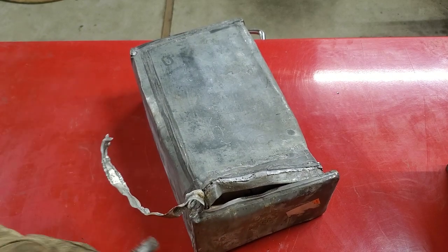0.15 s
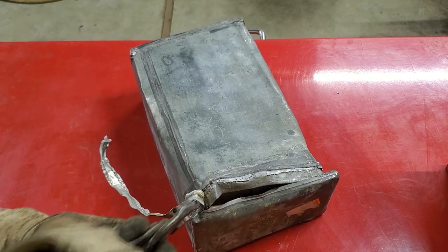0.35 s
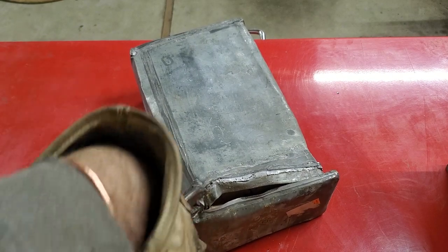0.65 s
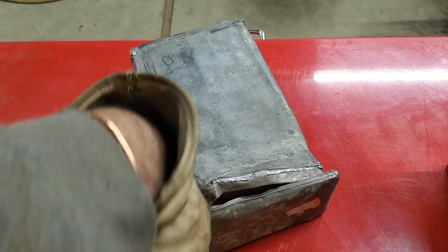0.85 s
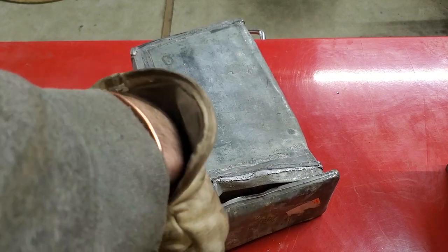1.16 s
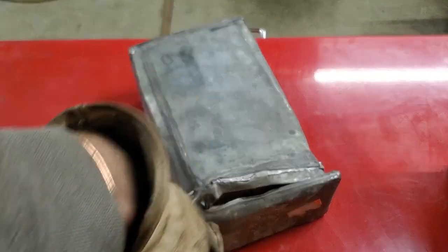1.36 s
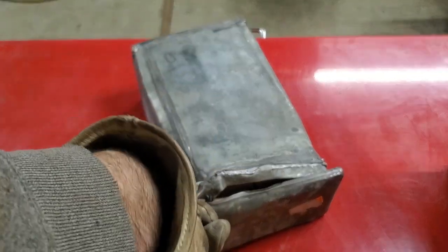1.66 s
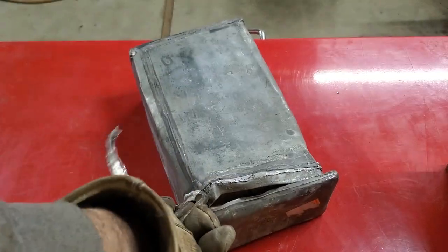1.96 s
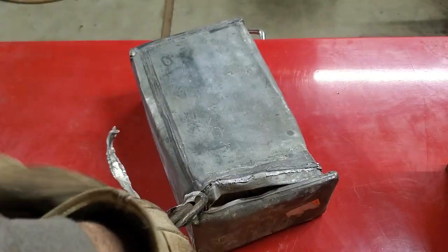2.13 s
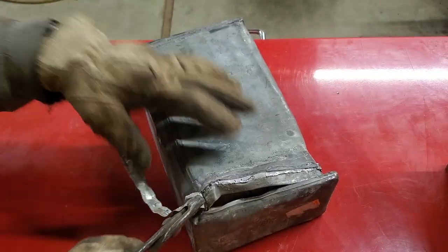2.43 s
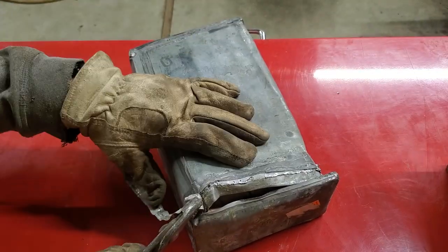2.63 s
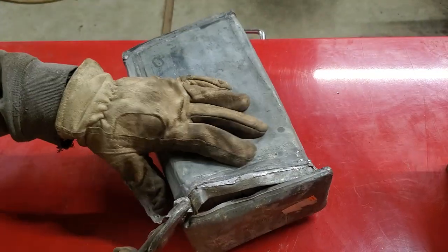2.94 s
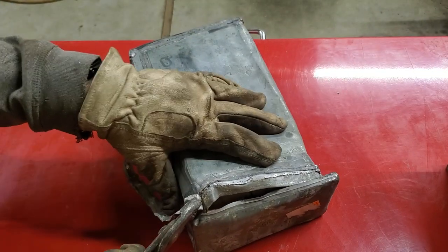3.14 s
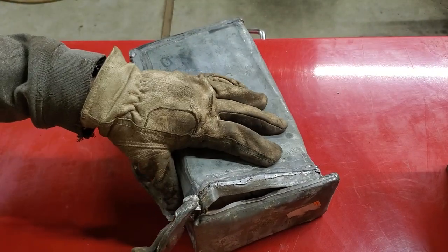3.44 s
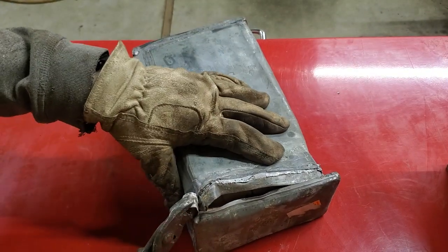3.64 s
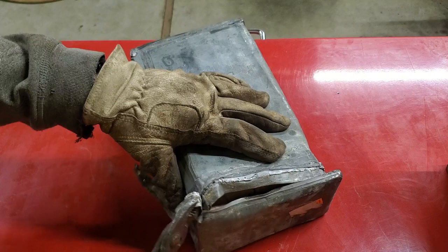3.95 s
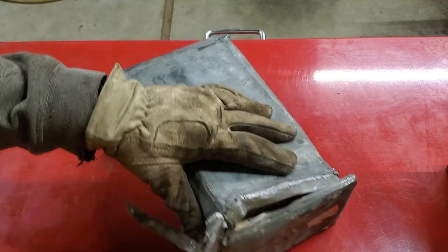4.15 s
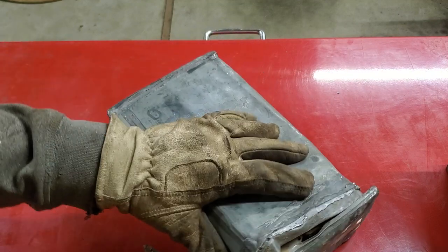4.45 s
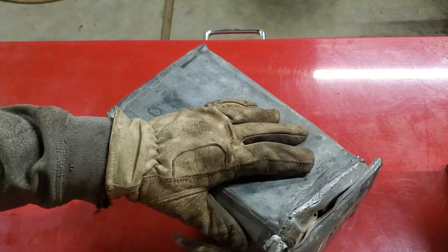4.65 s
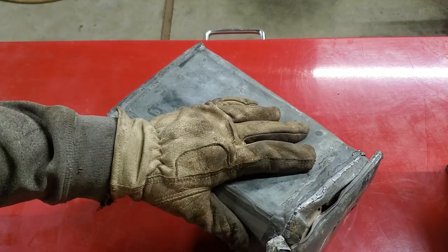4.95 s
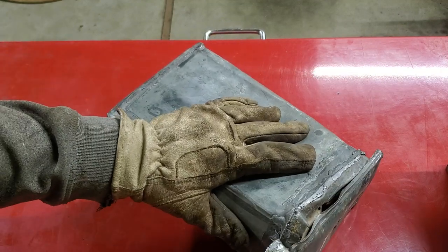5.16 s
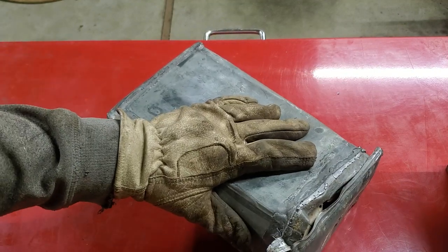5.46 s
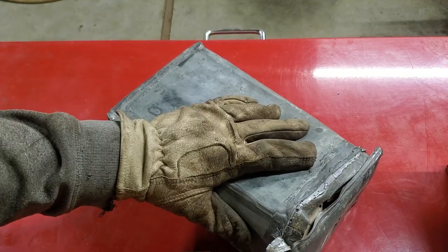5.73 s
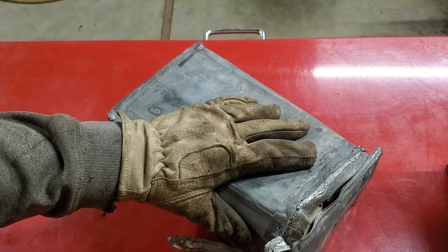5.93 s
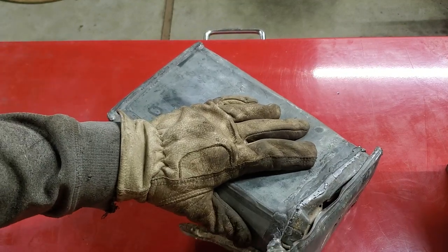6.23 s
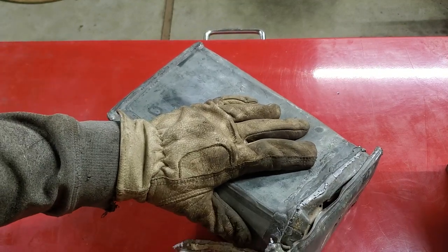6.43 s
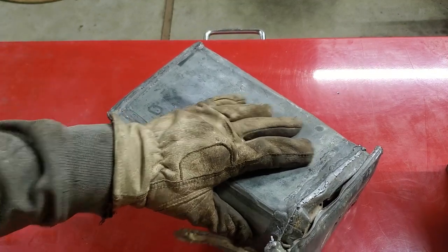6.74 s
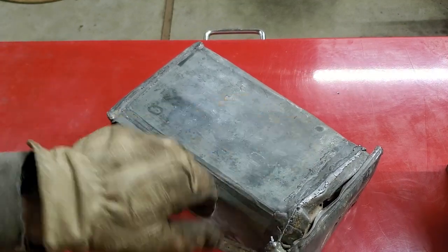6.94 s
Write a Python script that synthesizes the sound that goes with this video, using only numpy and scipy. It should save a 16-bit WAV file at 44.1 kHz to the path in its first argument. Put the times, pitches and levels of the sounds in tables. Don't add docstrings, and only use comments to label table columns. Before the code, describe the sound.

Close stereo pickup in a humming workshop. Gloves and sleeves rustle while pliers tick faintly at a thin tin. Small knocks follow, then a hard hollow clank with a bright wire jingle just after three seconds and another as the tin is turned. Leather squeaks thinly, steel clicks scatter, and a loud snap with a thunk ends it.

```python
import sys
import numpy as np
from scipy import signal
from scipy.fft import rfft, irfft
from scipy.io import wavfile
from scipy.ndimage import uniform_filter1d

SR = 44100
rng = np.random.default_rng(int(sys.argv[2]) if len(sys.argv) > 2 else 0)


def pcm_store(signal):
    levels = np.round(np.clip(np.atleast_2d(signal), -1, 1) * 32767)
    wavfile.write(sys.argv[1], SR, levels.astype(np.int16).T)


def natural_amplitude(level_db):
    exponent = np.asarray(level_db, float) / 20
    return 10 ** exponent


N = 312669

# frequency in Hz, level in dB, t60 in s.
BODY = [(60.4, -48, 0.13), (87.3, -9.5, 0.44), (137, -7.5, 0.5), (153, -2, 0.37), (175, 1.5, 0.14),
        (210, -6, 0.69), (251.8, 8.5, 0.087), (323.7, -5.5, 0.2), (386.4, 3, 0.08), (462, 6, 0.05),
        (541, -6.5, 0.23), (593, -6, 0.19), (732, -11.5, 0.069), (925, -15, 0.012)]


def evened(x):
    return x / np.sqrt(np.mean(x ** 2) + 1e-20)


def read(points, hz):
    f, value = np.transpose(points)
    return np.interp(np.log(hz + 1), np.log(f + 1), value)


def add(mix, s, sound):
    part = mix[..., round(s * SR):][..., :sound.shape[-1]]
    part += sound[..., :part.shape[-1]]


def band(x, lo_hz, hi_hz):
    return signal.sosfilt(signal.butter(2, [lo_hz, hi_hz], "band", fs=SR, output="sos"), x)


def ring(modes, t):
    return sum(natural_amplitude(db - 60 * t / t60) * np.sin(2 * np.pi * hz * t) for hz, db, t60 in modes)


def pair(a, b):
    # frequency in Hz, shared part from -1 to 1.
    likeness = [(60, 0.97), (130, 0.99), (290, 0.85), (640, 0.19), (1410, -0.35), (3100, 0.019),
                (6820, -0.049), (15000, -0.011)]
    same = read(likeness, np.fft.rfftfreq(N, 1 / SR))
    second = same * rfft(a) + np.sqrt(1 - same ** 2) * rfft(b)
    return np.array([a, irfft(second, N)])


def split(a, b):
    split_hz = 350
    low = signal.butter(1, split_hz, "low", fs=SR)
    high = signal.butter(1, split_hz, "high", fs=SR)
    return np.array([a, signal.lfilter(*low, a) + signal.lfilter(*high, b)])


def hum():
    # frequency in Hz, density in dB per Hz.
    spectrum = [(25, -108), (45, -77), (63, -61.5), (85, -80.5), (120, -65.5), (160, -76), (300, -84.5),
                (500, -81), (700, -88), (1100, -94), (2000, -91), (4000, -99), (6500, -101), (8200, -109),
                (11000, -104), (16000, -106)]
    hz, _, z = signal.stft(rng.standard_normal((2, N)), SR, nperseg=4096)
    patches = uniform_filter1d(rng.standard_normal(z.shape[1:]), 6, 0)
    patches = evened(uniform_filter1d(patches, 4, 1))
    drift_db = 1.6 + 2.46 * (hz < 110)
    z = z * natural_amplitude(read(spectrum, hz)[:, None] + drift_db[:, None] * patches) * np.sqrt(SR / 2)
    return pair(*signal.istft(z, SR, nperseg=4096)[1][:, :N])


def rub():
    # start in s, length in s, cloth level in dB, leather level in dB.
    stroke_rows = [(0, 0.066, -50.5, -61), (0.082, 0.3, -55, -65), (1.098, 0.12, -61, -60.5),
                   (1.18, 0.13, -56, -63), (1.652, .22, -74, -68), (1.899, 0.16, -50, -50.5),
                   (1.958, 0.2, -63, -57.5), (2.08, 0.31, -59.5, -67), (2.374, 0.094, -57, -57),
                   (2.526, 0.21, -52.5, -52), (2.678, 0.18, -68, -60.5), (2.858, 0.32, -49.5, -52),
                   (3.274, 0.092, -59, -52.5), (3.441, 0.3, -47, -58), (3.594, 0.18, -39.5, -58),
                   (3.886, 0.16, -55, -70), (4.024, 0.46, -50.5, -64), (4.235, 0.15, -57, -59),
                   (4.337, 0.19, -51.5, -67), (4.454, 0.2, -52, -55), (4.596, 0.38, -48, -52.5),
                   (5.012, 0.14, -58, -65), (5.26, .1, -58, -57.5), (5.398, 0.2, -55, -59),
                   (5.647, 0.54, -51, -57), (6.317, 0.15, -57, -58.5), (6.447, 0.67, -60, -57),
                   (6.793, 0.13, -52, -52), (6.829, 0.14, -39.5, -62), (6.922, 0.19, -51.5, -66)]
    # time in s, restlessness in dB, weight on the tin in dB.
    hands = [(0, -59, -50.5), (.35, -74.5, -64.5), (1.0, -68.5, -53.5), (1.302, -71, -55.5),
             (1.8, -63, -54), (2.85, -67, -55), (3.35, -57.5, -42), (3.75, -63.5, -53.5), (4.4, -56, -47.5),
             (4.95, -67.5, -54.5), (5.6, -56.5, -52), (6.25, -65, -57), (6.5, -60, -55), (7.09, -55, -48.5)]
    rise, fall = 0.33, 0.66
    cloth_rest_db, stroke_drag_db = 1, 5
    t = np.arange(N) / SR
    s, rest_db, weight_db = np.transpose(hands)
    rest = natural_amplitude(np.interp(t, s, rest_db))
    strokes = np.zeros((2, N))
    for start, length, *db in stroke_rows:
        u = np.arange(0, 1, 1 / (length * SR))
        ramp = np.minimum(np.minimum(u / rise, (1 - u) / fall), 1)
        add(strokes, start, natural_amplitude(np.array(db))[:, None] * np.sin(np.pi / 2 * ramp) ** 2)

    cloth_gain = np.hypot(strokes[0], natural_amplitude(cloth_rest_db) * rest)
    leather_gain = np.hypot(strokes[1], rest)
    drag_gain = np.hypot(natural_amplitude(stroke_drag_db) * strokes[1], natural_amplitude(np.interp(t, s, weight_db)))

    grit = natural_amplitude(1.33 * evened(uniform_filter1d(rng.standard_normal(N), 250)))
    a, b = rng.standard_normal((2, 2, N)) * grit
    stiff = [(hz, db + 2.3 * np.log2(hz / 250), 0.35 * t60) for hz, db, t60 in BODY]
    drag = signal.oaconvolve(a, ring(stiff, np.arange(8000) / SR)[None])[:, :N]
    leather = band(b, 740, 6100)
    cloth = band(a, 7050, 20000)
    sound = drag_gain * evened(drag)
    sound = sound + natural_amplitude(2.0) * leather_gain * evened(leather) + natural_amplitude(3.5) * cloth_gain * evened(cloth)
    return pair(*sound)


def thuds():
    # start in s, peak in dB, chatter length in s,
    # brightness in dB per octave, struck spot in Hz.
    knocks = [(1.937, -17, 0.013, -6.5, 306), (1.95, -18, 0.0033, -1.5, 485), (2.005, -22, 0.05, -5, 197),
              (2.562, -23.5, 0.0044, -2, 226), (2.569, -29, 0.0053, -25, 360), (2.58, -41, 0.0075, -2, 132),
              (3.12, -11.5, 0.0088, 10, 186), (3.133, -11.5, 0.022, 1, 155),
              (3.264, -14.5, 0.016, -0.5, 310), (3.587, -26.5, 0.0078, 1, 170), (4.174, -16, 0.011, 7, 232),
              (4.19, -15.5, 0.035, -0.5, 187), (4.765, -19, 0.011, -5.5, 547), (4.8, -25.5, 0.014, -3, 192),
              (6.079, -26.5, 0.011, 0.5, 390), (6.156, -28.5, 0.015, -5.5, 400),
              (6.425, -26, 0.0074, -1, 740), (6.681, -33.5, 0.019, 16, 630), (6.732, -28.5, 0.031, -7, 141),
              (7.0685, -11, 0.012, 2, 600)]
    # start in s, peak in dB, brightness in dB per octave, struck spot in Hz.
    nudges = [(.735, -36, -3, 200), (0.835, -34.5, 7, 423), (1.008, -43, 20, 541), (1.557, -38, 10, 369),
              (1.743, -30, 2, 611), (1.78, -35.5, -10, 500), (2.21, -39, 16, 143), (2.645, -38, 13, 423),
              (2.95, -43, -3, 375), (3.545, -33, -8, 181), (3.809, -31.5, 0.5, 175),
              (3.921, -28.5, -2, 208), (5.503, -37, -2, 153), (6.417, -30, 5, 293), (6.596, -31, -5, 210),
              (6.79, -34, 23, 133)]
    knock_damping, nudge_damping, nudge_chatter_s = 1.75, 2.1, 0.018
    out, t = np.zeros(N), np.arange(SR // 2) / SR
    blows = [(knock_damping, *row) for row in knocks]
    blows += [(nudge_damping, s, db, nudge_chatter_s, *row) for s, db, *row in nudges]
    for damping, s, db, length, tilt_db, spot_hz in blows:
        chance = np.clip(rng.standard_normal((len(BODY), 2)), -2, 2) * [.03, 1.5]
        modes = []
        for (hz, mode_db, t60), (shift, lift_db) in zip(BODY, chance):
            spot_db = 5 * np.exp(-(np.log2(hz / spot_hz) / .35) ** 2)
            level_db = mode_db + lift_db + tilt_db * np.log2(hz / 250) + spot_db
            modes.append((hz * (1 + shift), level_db, min(t60, .22) / damping))
        bumps = rng.standard_normal(len(t)) * natural_amplitude(5.5 * rng.standard_normal(len(t) // 50).repeat(50))
        chatter = 0.17 * np.exp(-(t / length) ** 2)
        shudder = 0.093 * natural_amplitude(-60 * t * damping / 0.61)
        push = 0.17 * np.exp(-((t - .001) / 0.00044) ** 2)
        drive = evened(bumps) * (chatter + shudder) - push
        sound = signal.fftconvolve(ring(modes, t[:10000]), drive)
        add(out, s, natural_amplitude(db) * sound / abs(sound).max())
    return out


def pops():
    # start in s, peak in dB, frequency in Hz, t60 in s.
    panels = [(0.835, -38, 395, 0.04), (1.571, -43, 304, 0.06), (1.744, -57, 610, 0.04),
              (1.781, -45, 630, 0.054), (1.945, -29, 464, 0.084), (2.574, -30.5, 472, 0.049),
              (2.586, -32, 298, 0.073), (4.767, -33, 590, 0.029), (6.428, -29, 742, 0.057),
              (6.69, -44, 680, .05), (6.731, -36.5, 672, 0.085), (6.795, -35.5, 624, 0.068),
              (1.952, -27, 520, 0.053), (1.939, -28, 230, 0.036), (2.5618, -25, 240, .035),
              (.736, -35, 215, 0.071), (1.0105, -44, 580, 0.024), (7.069, -18, 272, 0.051),
              (4.73, -35, 150, .07), (3.122, -16.5, 455, 0.05), (3.139, -18, 436, 0.053),
              (3.156, -14.5, 159, .07), (3.19, -34, 460, .07), (3.289, -31, 300, .07),
              (4.19, -27, 409, 0.064), (4.768, -26.5, 526, 0.073), (4.803, -31, 550, 0.055),
              (4.803, -19.5, 140, .07), (5.093, -50, 200, .05), (7.0695, -19.5, 463, 0.079),
              (7.073, -30, 152, 0.064)]
    # start in s, peak in dB, frequency in Hz, t60 in s.
    wires = [
        (3.122, -35, 11040, .07),
        (3.138, -35, 13605, .11),
        (2.74, -54, 14100, .1),
    ]
    out, t = np.zeros(N), np.arange(SR // 4) / SR
    damped = [(s, db, hz, min(t60, .075)) for s, db, hz, t60 in panels]
    for s, db, hz, t60 in damped + wires:
        add(out, s, ring([(hz, db, t60)], t) * np.minimum(t / 0.0018, 1))
    return out


def clicks():
    # start in s, ring peak in dB, crack in dB, fizz in dB, ring in Hz.
    snips = [(.738, -44, -46, -65, 1860), (1.01, -58, -59, -52, 1850), (1.247, -47, -44.5, -41, 1480),
             (1.94, -40, -31.5, -38, 1540), (2.348, -59, -59, -52, 2410), (2.575, -46, -42, -38, 1420),
             (2.596, -55, -35, -36, 3000), (3.614, -27, -40, -14.5, 3280), (3.625, -42, -45, -17, 3300),
             (3.663, -37.5, -42, -29, 1240), (3.807, -40.5, -33.5, -48, 1500),
             (3.852, -34.5, -32, -62, 2720), (3.866, -39.5, -34, -56, 1090), (4.843, -33, -32, -36, 2620),
             (5.28, -57, -65, -42, 1610), (5.502, -34, -67, -62, 3070), (5.774, -36.5, -39, -52, 2560),
             (6.065, -24, -26.5, -37, 2300), (6.082, -24.5, -69, -27, 2440),
             (6.181, -30.5, -37.5, -58, 2220), (7.069, -23, -12, -4.5, 2720), (7.0725, -22, -15, -19, 2790)]
    # start in s, ring peak in dB, crack in dB, fizz in dB.
    clanks = [(1.743, -36.5, -54, -59), (1.78, -43, -58, -53), (1.924, -40, -48, -54),
              (1.954, -25, -50, -40), (2.03, -49, -54, -35.5), (2.389, -40, -53, -46),
              (2.429, -46, -54, -41.5), (3.121, -19, -24, -35), (3.134, -17, -17.5, -44),
              (3.179, -43, -36, -22), (3.264, -24, -29.5, -37), (3.483, -51, -61, -55),
              (3.516, -61, -47, -39), (3.918, -44, -42.5, -37.5), (4.173, -19, -24, -32),
              (4.198, -28, -36, -27), (4.773, -27, -39, -22.5), (5.032, -56, -61, -46),
              (5.1, -36.5, -48, -58), (6.426, -21.5, -32.5, -33.5), (6.684, -37, -47, -52),
              (6.729, -29, -71, -39), (6.793, -28.5, -37, -39)]
    wall_hz = 850
    out, t = np.zeros((2, N)), np.arange(SR // 4) / SR
    # t60 in s, ring and spread in dB
    contacts = [(.024, -2, -6, *row) for row in snips]
    contacts += [(0.061, -13, -4, *row, wall_hz) for row in clanks]
    for t60, ring_db, spread_db, s, low_db, crack_db, fizz_db, ring_hz in contacts:
        grain = natural_amplitude(2.0 * rng.standard_normal(len(t) // 45 + 1).repeat(45)[:len(t)])
        fade = natural_amplitude(-60 * t / t60) + .6 * np.exp(-t / .002)
        crack = rng.standard_normal((2, len(t))) * grain * fade
        crack[:, 0] = 2.6
        bands = [(ring_hz / 1.3, ring_hz * 1.3, low_db + ring_db),
                 (700, 3400, low_db + spread_db),
                 (3170, 8930, crack_db + 6.5),
                 (6800, 15200, fizz_db + 4.5)]
        for lo_hz, hi_hz, db in bands:
            part = band(crack, lo_hz, hi_hz)
            add(out, s, natural_amplitude(db - 1.5) * part / abs(part.mean(0)).max())
    return split(*out)


def pings():
    plier_hz = [725, 1050, 1420, 1980, 2370, 2885, 4350, 5090, 5650, 6330]
    # start in s, ring peak in dB, struck spot in Hz,
    # tick in dB.
    meetings = [(1.012, -49, 1900, -50), (3.122, -24, 1520, -25), (3.2633, -28, 1200, -20),
                (3.613, -45, 5600, -34), (3.627, -47, 5600, -38), (3.806, -44, 5600, -30),
                (3.851, -44, 5600, -32), (4.173, -27, 3500, -26), (4.767, -30, 1000, -50),
                (5.29, -60, 5000, -48), (5.501, -34, 1900, -60), (5.775, -53, 2300, -60),
                (6.0655, -24, 1900, -39), (6.083, -26, 2300, -27), (6.181, -34, 2400, -39),
                (6.4266, -34, 3200, -30), (6.683, -40, 1300, -50), (6.731, -37, 1500, -50),
                (6.794, -39, 1500, -45),
                (2.3472, -42, 3000, -27),
        (4.842, -36, 1700, -32),
        (7.0702, -30, 2500, -12),
        (3.1355, -34, 5600, -22),
        (5.093, -50, 1200, -46),
        (2.3475, -60, 5600, -30),
    ]
    t60, far_db = 0.025, -12
    out, t = np.zeros((2, N)), np.arange(SR // 10) / SR
    for s, ring_db, spot_hz, tick_db in meetings:
        modes = [(hz, far_db * min(np.log2(hz / spot_hz) ** 2, 2), t60) for hz in plier_hz]
        steel = ring(modes, t)
        snap = rng.standard_normal((2, len(t)))
        tick = band((snap + snap[::-1] / 2) * np.exp(-t / .0007), 1800, 20000)
        add(out, s, natural_amplitude(ring_db) * steel / abs(steel).max() + natural_amplitude(tick_db) * tick / abs(tick).max())
    return out


def tinks():
    # start in s, peak in dB, frequency in Hz, t60 in s.
    strikes = [(1.012, -48, 1850, .012), (1.78, -44, 890, 0.015), (6.0655, -36, 2250, .014),
               (6.181, -37, 2860, 0.011), (1.9385, -32, 2100, .012), (1.95, -39, 1620, .03),
               (4.173, -29, 3800, .02), (4.844, -29, 1020, 0.018), (4.841, -42, 2400, .01),
               (5.091, -42.5, 1050, 0.045), (5.093, -48, 1530, .03), (5.775, -45, 2350, .02),
               (6.065, -21, 2040, 0.016), (6.0652, -25.5, 1080, 0.025), (6.0652, -29.5, 1430, 0.021),
               (6.067, -32, 2930, .018), (6.083, -40, 2370, .03), (6.082, -31, 910, .03),
               (6.181, -30, 2340, 0.014), (6.182, -36.5, 1150, 0.029), (6.182, -36, 1430, 0.029),
               (6.683, -37, 1110, 0.013), (6.4268, -33, 3540, 0.012)]
    lag_rad = 1.5
    out, t = np.zeros((2, N)), np.arange(SR // 10) / SR
    for s, db, hz, t60 in strikes:
        tone = np.sin(2 * np.pi * hz * t - [[0], [lag_rad]])
        start = np.minimum(t * hz * 2, 1)
        add(out, s, natural_amplitude(db - 60 * t / t60) * tone * start)
    return out


def jingles():
    # start in s, wire peak in dB, shaking length in s, modes off the main cluster in
    # dB, clatter in dB.
    shakes = [(1.94, -41.5, 0.015, -7, 0), (2.572, -43.5, 0.048, 3, -1.5), (2.743, -63, 0.03, -1.5, -1),
              (3.118, -27, 0.028, 2, -1), (3.144, -27.5, 0.033, 6, -6), (3.176, -41, 0.04, 1, 1),
              (3.222, -53, 0.043, -1, 2.5), (3.265, -38, 0.012, 2, 7), (4.176, -26.5, 0.02, 7, -5.5),
              (4.19, -25.5, 0.034, 8, -11), (4.229, -54, 0.029, 1, 6), (4.7526, -40.5, 0.063, 12, -1),
              (7.068, -20, 0.041, 13, -4)]
    handle_hz = [5480, 9850, 10450, 11040, 11860, 12170, 11820, 13605, 14250, 14700, 15100, 9735, 11420,
                 12390]
    # level in dB, t60 in s.
    handle = [(-25, .06), (0, .08), (2, 0.065), (-6, .05), (5, .12), (-6, .12), (-9, 0.1), (-15, 0.079),
              (2.5, 0.1), (-10, .08), (-4, .1), (2.5, 0.083), (-1, .1), (1, .12)]
    out, t = np.zeros((2, N)), np.arange(SR // 3) / SR
    for s, db, length, outer_db, clatter_db in shakes:
        shake = np.exp(-(t / length) ** 4) * np.minimum(t / 0.008, 1)
        taps = (rng.random(len(t)) < 1500 / SR) * rng.standard_normal(len(t)) * shake
        modes = []
        for hz, (mode_db, t60) in zip(handle_hz, handle):
            if abs(hz - 11900) > 500:
                modes.append((hz, mode_db + outer_db, min(t60, .045)))
            else:
                modes.append((hz, mode_db, min(t60, .11)))
        wire = signal.fftconvolve(ring(modes, t), taps)[:len(t)]
        noise = rng.standard_normal((2, len(t))) * shake
        clatter = natural_amplitude(-1.0) * band(noise, 10100, 16600)
        clatter += natural_amplitude(-1.5) * band(noise, 7200, 7400)
        clatter += natural_amplitude(-1.0) * band(noise, 300, 7400)
        add(out, s, natural_amplitude(db + 7.0) * (wire / abs(wire).max() + natural_amplitude(clatter_db) * clatter))
    return out


def squeaks():
    # time in s, pitch in Hz.
    glides = [
        [(5.135, 14900), (5.141, 15550), (5.15, 15850), (5.16, 15700), (5.168, 15300), (5.19, 14950)],
        [(5.222, 8320), (5.245, 8320), (5.26, 8200), (5.285, 8180), (5.295, 8050)],
        [(5.322, 15000), (5.328, 15250), (5.335, 15800)],
        [(5.355, 9320), (5.383, 9073), (5.405, 8900), (5.435, 9340), (5.471, 9549), (5.505, 9630), (5.53, 9450),
         (5.545, 9480)],
        [(5.535, 9470), (5.57, 9530), (5.597, 9570), (5.625, 9200), (5.645, 8930), (5.667, 9131), (5.68, 9450),
         (5.70, 9850), (5.73, 9950)],
        [(5.97, 10250), (6.0, 10000), (6.025, 9750), (6.045, 9000), (6.06, 8400)],
        [(6.09, 14700), (6.1, 14000), (6.112, 13400)],
        [(6.305, 12300), (6.33, 14000), (6.345, 15400), (6.41, 15350), (6.5, 15200), (6.56, 15500),
         (6.66, 15300), (6.78, 15400)],
        [(6.32, 13600), (6.45, 14000), (6.53, 13900), (6.58, 13300), (6.64, 13800), (6.72, 14100)],
    ]
    # level in dB, blur in Hz, left-right difference in dB.
    voices = [(-56, 90, 0), (-58, 20, 7), (-57, 60, 0), (-64, 15, 14), (-66, 15, 13), (-65, 20, 5),
              (-60, 60, 0), (-61, 200, 7), (-65, 450, 13)]
    fade_s = 0.015
    out = np.zeros((2, N))
    for glide, (db, blur_hz, pan_db) in zip(glides, voices):
        s, hz = np.transpose(glide)
        t = np.arange(s[0], s[-1], 1 / SR)
        pitch = uniform_filter1d(np.interp(t, s, hz), size=300)
        r = np.exp(-np.pi * blur_hz / SR)
        noise = rng.standard_normal((2, len(t) + 4000))
        a, b = signal.lfilter([1], [1, -r], noise)[:, 4000:] * np.sqrt(1 - r * r)
        steady = np.exp(-blur_hz / 150)
        wobble = steady + (1 - 0.61 * steady) * (a + 1j * b)
        tone = (wobble * np.exp(2j * np.pi * np.cumsum(pitch) / SR)).real
        fade = np.clip(np.minimum(t - t[0], t[-1] - t) / fade_s, 0, 1)
        gain = natural_amplitude(db + np.array([[.5], [-.5]]) * pan_db)
        add(out, s[0], gain * np.sqrt(2) * tone * fade)
    return out


def room(x):
    # frequency in Hz, t60 in s.
    decay = [(100, 0.41), (400, 0.28), (1200, 0.22), (3000, 0.19), (8000, 0.27), (16000, 0.13)]
    taps = np.zeros((2, SR))
    at = np.arange(120, SR - 20, 20) + rng.integers(0, 20, (2, (SR - 121) // 20))
    np.put_along_axis(taps, at, rng.choice([-1., 1.], at.shape), 1)
    hz, t, z = signal.stft(taps, SR, nperseg=256)
    tail = signal.istft(z * natural_amplitude(-60 * t / read(decay, hz)[:, None]), SR, nperseg=256)[1]
    tail = pair(*np.pad(tail, ((0, 0), (0, N - tail.shape[1]))))[:, :SR]
    tail = tail * (np.arange(SR) >= 120)
    return signal.fftconvolve(x[None], tail / np.linalg.norm(tail[0]), axes=1)[:, :N]


def scene():
    thud, click, jingle = thuds(), clicks(), jingles()
    wet = room(natural_amplitude(-4.5) * thud + natural_amplitude(-6.0) * click[0] + natural_amplitude(-5.0) * jingle[0])
    bed = rub() + hum()
    ping, tink = pings(), tinks()
    steel = ping + room(natural_amplitude(-12.0) * ping[0]) + tink + room(natural_amplitude(-15.0) * tink[0])
    return thud + click + jingle + wet + bed + steel + pops() + squeaks()


def band_limit(x):
    return signal.sosfilt(signal.butter(12, 16880, fs=SR, output="sos"), x)


def record(dry):
    # frequency in Hz, left level in dB, right level in dB.
    housing = [(20.5, -25, -27.5), (60.4, -5, -4), (1540, 2.5, -0.43), (4900, -0.96, -1.7),
               (6715, 1.5, 0.5), (7460, -12.5, -15.5), (7900, -22.5, -12.5), (9150, -7.5, -14),
               (11350, -1, 3), (12340, -1.5, -2), (14400, 1, -10.5), (15600, -5, -20.5)]
    # frequency in Hz, level in dB.
    edge = [(15740, 0), (15920, -45), (16300, -70)]
    hz = np.fft.rfftfreq(4096, 1 / SR)
    colour_db = np.array([read([(row[0], row[k]) for row in housing], hz) + read(edge, hz) for k in (1, 2)])
    log_gain = np.log(natural_amplitude(np.concatenate([colour_db, colour_db[:, -2:0:-1]], 1)))
    taps = np.fft.ifft(np.exp(np.conj(signal.hilbert(log_gain)))).real
    mix = signal.oaconvolve(dry, taps, axes=1)[:, :N]
    return band_limit(mix)


dry = scene()
out = record(dry)
pcm_store(out)
```